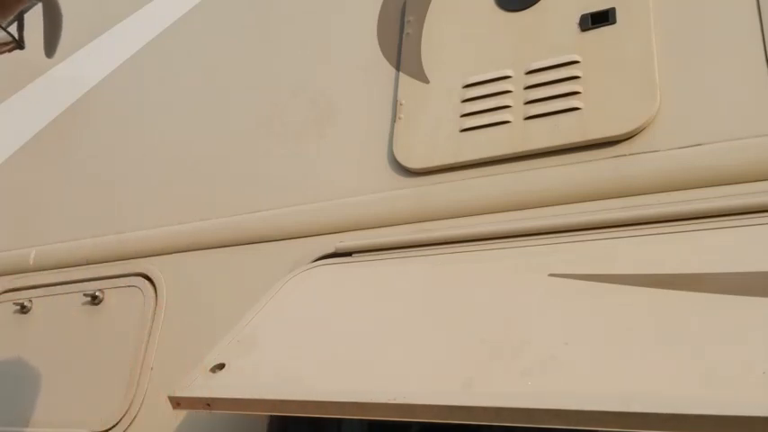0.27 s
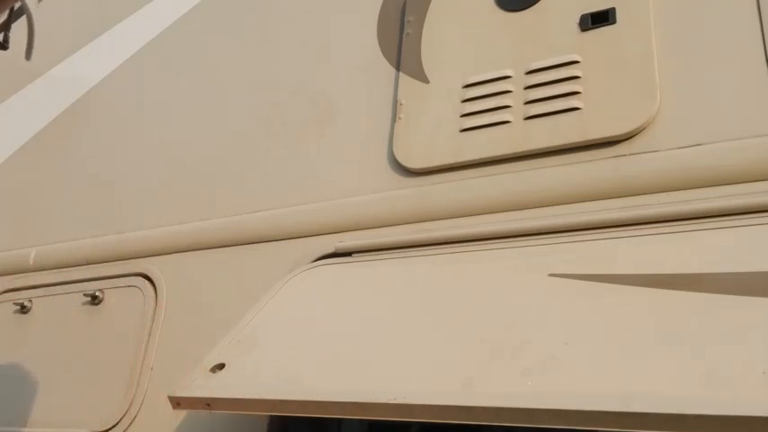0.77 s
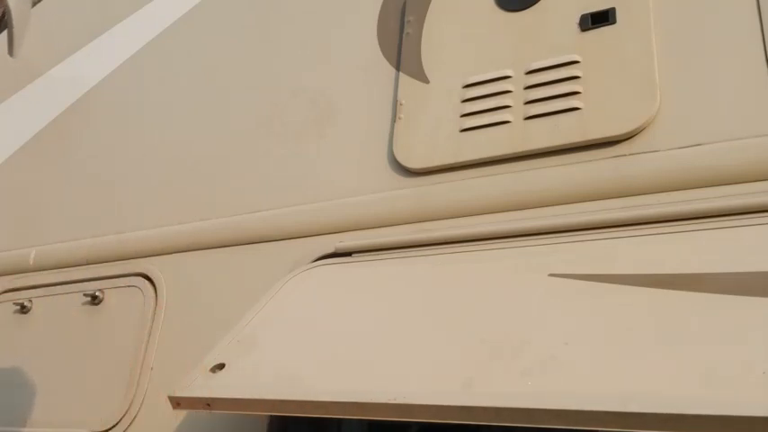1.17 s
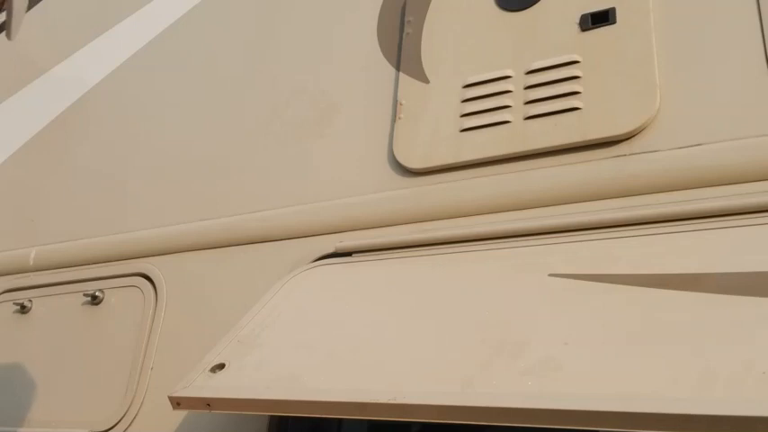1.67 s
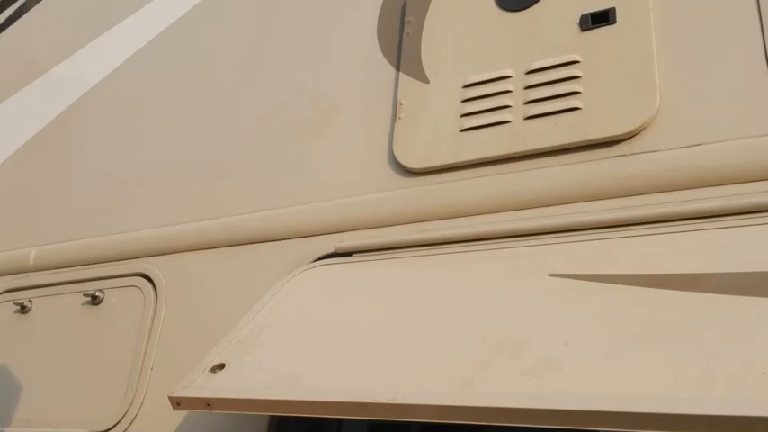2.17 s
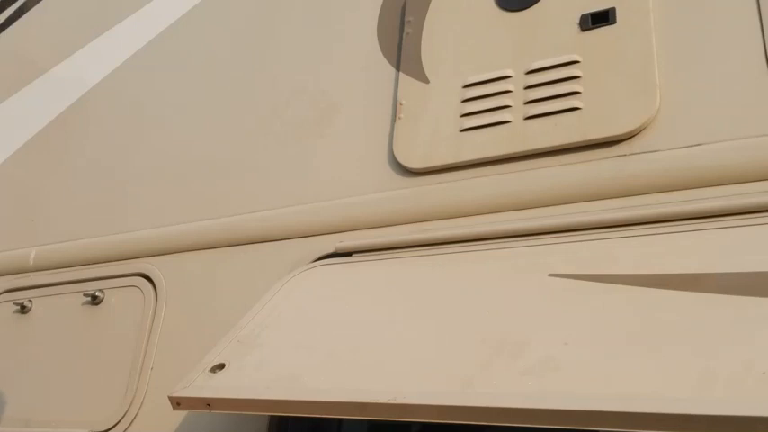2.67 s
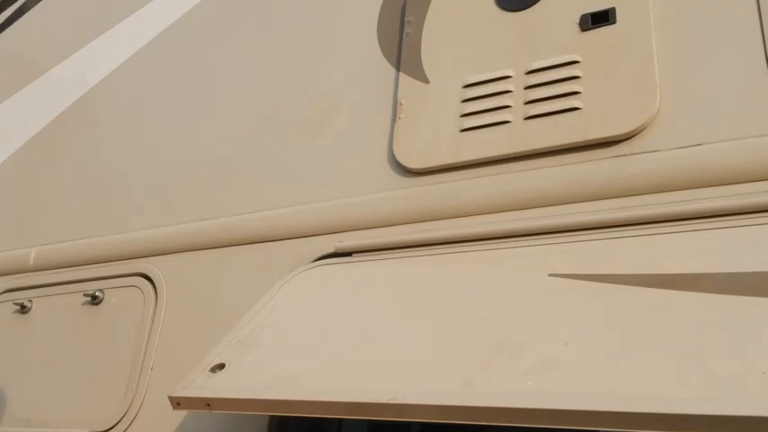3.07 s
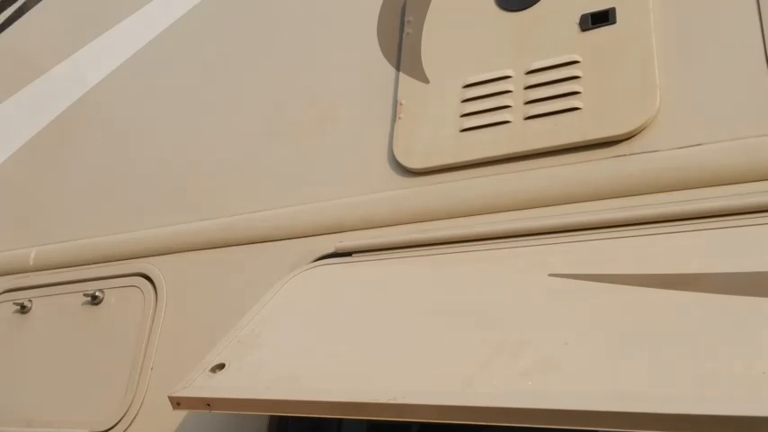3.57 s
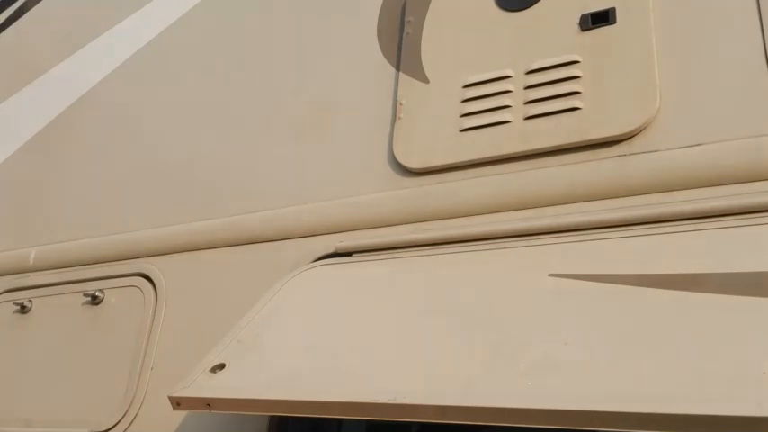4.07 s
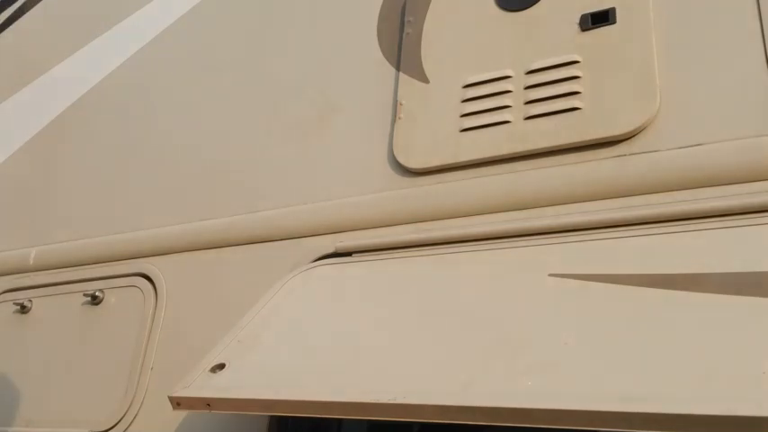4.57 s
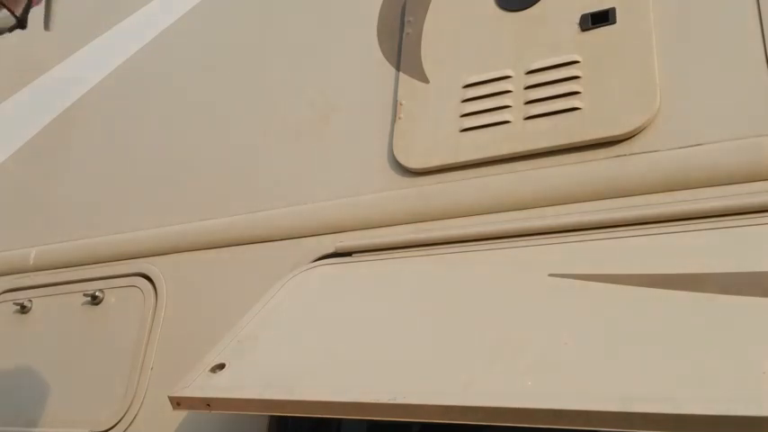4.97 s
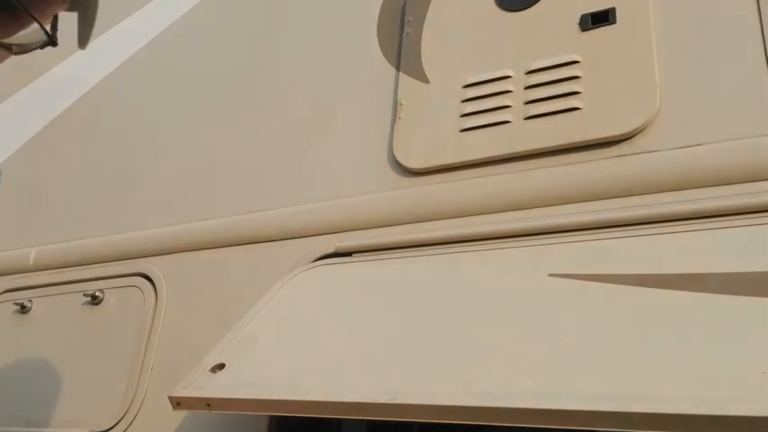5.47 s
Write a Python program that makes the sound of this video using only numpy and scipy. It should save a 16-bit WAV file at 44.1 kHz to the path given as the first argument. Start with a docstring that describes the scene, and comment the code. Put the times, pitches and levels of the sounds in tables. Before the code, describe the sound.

Outdoors, a close stereo microphone pair picks up fingers shuffling tiny metal pieces, stronger on the right and duller on the left. Faint chirps open over rumble and hiss; clusters of clicks and scrapes follow, short bird whistles pass around two seconds, then keen metallic rings and a hard clink. A quieter gap with chirping ends in a last rub and tick.

```python
"""Small metal lock parts are handled over a low rumble of far traffic and a soft hiss, with faint falling bird
chirps near the start and the end. Hands move the parts close by on the right: shaped noise makes the rubbing,
short noise bursts the ticks, and decaying sines the soft knocks and the ringing of three parts. The birds are
gliding sine tones: one sings chirps, another whistles short notes. Filtered noise makes the rumble, the hiss of
traffic and leaves, and the breeze at the left microphone, which also gets single low bumps of air."""
import sys
import numpy as np
from scipy import signal
from scipy.fft import rfft, irfft, next_fast_len
from scipy.io import wavfile
from scipy.ndimage import uniform_filter1d, map_coordinates

SR = 44100
rng = np.random.default_rng(int(sys.argv[2]) if len(sys.argv) > 2 else 0)


def int16_out(signal):
    """Quantize to a 16-bit WAV file."""
    q = np.round(np.clip(np.atleast_2d(signal).T, -1, 1) * 32767)
    wavfile.write(sys.argv[1], SR, q.astype(np.int16))


N = 252252  # length in samples


def amp(db):
    """Turns decibels into a plain multiplier."""
    return 10 ** (np.asarray(db) / 20)


def unit(x):
    """Scales a sound to an average (RMS) strength of one."""
    return x / np.sqrt(np.mean(x ** 2) + 1e-20)


def along(points, hz):
    """Reads a curve of (Hz, value) points, spaced on a log axis."""
    point_hz, value = np.transpose(points)
    return np.interp(np.log(hz + 1), np.log(point_hz + 1), value)


def curves(rows):
    """Gives one value per sample for each column after the time."""
    seconds, *columns = np.transpose(rows)
    return [np.interp(np.arange(N) / SR, seconds, column) for column in columns]


def wobble(rate):
    """Draws a smooth random curve through `rate` random points a second."""
    points = rng.standard_normal(int(N * rate / SR) + 4)
    return map_coordinates(points, [np.arange(N) * rate / SR])


def filtered(x, response):
    """Multiplies the spectrum of x by a complex response of frequency."""
    size = next_fast_len(N + SR // 4)
    spectrum = rfft(x, size) * response(np.fft.rfftfreq(size, 1 / SR))
    return irfft(spectrum, size)[..., :N]


def coloured(x, spectrum, size=8192):
    """Filters x to the shape of a spectrum with no pre-echo, keeping the power of white noise."""
    shape = amp(along(spectrum, np.fft.rfftfreq(size, 1 / SR))) + 0.001
    # folding the cepstrum puts the filter's whole response after time zero
    cepstrum = irfft(np.log(shape), size)
    cepstrum[1:size // 2] *= 2
    cepstrum[size // 2 + 1:] = 0
    pulse = irfft(np.exp(rfft(cepstrum)), size)
    return signal.fftconvolve(x, pulse / np.linalg.norm(pulse))[:N]


def peak(f, hz, width_hz):
    """Gives the response of one resonance, which rings only after it is driven."""
    return 1j * f * width_hz / (hz * hz - f * f + 1j * f * width_hz)


def add(track, seconds, sound):
    """Mixes a sound into a track at a time."""
    part = track[max(round(seconds * SR), 0):][:len(sound)]
    part += sound[:len(part)]


# Where the hands are. Each row: time in seconds, extra level of the left treble in dB.
HAND_POSITION = [(0, -25), (1.5, -7), (2.1, -10), (2.6, -12), (3.3, -30), (4.6, -10.5), (5.4, 1)]
# How the left side is balanced. Each row: frequency in Hz, level of the left side in dB.
HAND_BALANCE = [(200, -2), (1300, 4.5), (4400, -1), (7000, -2)]


def hands():
    """The body holding the microphones shades the left one: later, duller, partly another face of the parts."""
    clumps = (1.4 + catches(rate=350)) * amp(2 * wobble(60))

    def face():
        return rubbing(clumps) + ticks() + knocks() + hollow() + ringing()

    def late(hz):
        delay_s = 0.0003347
        return amp(along(HAND_BALANCE, hz)) * np.exp(-2j * np.pi * hz * delay_s)

    def treble(hz):
        return 1 / (1 + (8200 / (hz + 1)) ** 4)

    right = face()
    left = .6 * right + .8 * face()
    left_treble = filtered(left, lambda hz: late(hz) * treble(hz))
    shaded = amp(curves(HAND_POSITION)[0]) * left_treble
    left_rest = filtered(left, lambda hz: late(hz) * (1 - treble(hz)))
    return np.array([left_rest + shaded, right])


def catches(rate):
    """Random catches, `rate` a second on average: sudden, very unequal, gone in a few milliseconds."""
    draw = rng.random(N)
    size_db = 5 * np.minimum(rng.exponential(size=N), 2.2)
    slip = amp(-60 * np.arange(SR // 50) / SR / .008)  # falls 60 dB in 8 ms
    hits = (draw < rate / SR) * amp(size_db)
    return unit(signal.fftconvolve(hits, slip)[:N])


def patchy(x, depth_db):
    """Every few milliseconds another spot is touched and other frequencies stand out."""
    z = signal.stft(x, nperseg=256)[2]
    field = uniform_filter1d(rng.standard_normal(z.shape), size=2, axis=0)
    field = uniform_filter1d(field, size=4, axis=1)
    return unit(signal.istft(z * amp(depth_db * unit(field)), nperseg=256)[1][:N])


# Parts and fingers sliding. Each row: start in seconds, length in seconds, base level of the scrape in dB,
# base level of the fine metal fizz in dB.
STROKES = [(0.716, 0.094, -63, -63), (0.857, 0.096, -52, -51), (1.013, 0.04, -54, -47.5),
           (1.054, 0.037, -53, -46.5), (1.272, 0.052, -95, -57), (1.326, 0.044, -54, -53),
           (1.357, 0.091, -52.5, -53), (1.507, 0.022, -43, -28), (1.919, 0.036, -59.5, -49.5),
           (2.558, 0.15, -45, -35), (2.595, 0.014, -49.5, -30), (2.747, 0.1, -67, -53.5),
           (2.827, 0.06, -58, -41), (2.978, 0.33, -62, -45), (3.085, 0.11, -49, -37.5),
           (3.159, 0.058, -42, -30.5), (3.23, 0.23, -62, -41), (3.495, 0.18, -69, -43),
           (3.889, 0.015, -33, -17.5), (3.921, 0.1, -46.5, -31.5), (4.177, 0.067, -68, -47.5),
           (4.492, 0.074, -60, -49), (4.562, 0.015, -46.5, -52), (5.093, 0.025, -84, -60),
           (5.488, 0.11, -48, -53), (5.549, 0.14, -45, -50.5)]
# How much skin drags along. Each row: time in seconds, level of the dull body over the scrape in dB.
SKIN_DRAG = [(.75, -7), (.9, -4.5), (1.05, -10.5), (2.1, 4), (2.4, 4), (2.85, -22.5), (3.15, -9),
             (4.6, -13.5), (5.5, -3)]
# The hands' steady small shuffling. Each row: time in seconds, base level in dB.
SHUFFLING = [(.6, -90), (.9, -62), (2.4, -64), (3.4, -64), (3.8, -75.5), (4.6, -78.5), (4.8, -101.5)]
# Tone of the scrape, the fizz and the dull body. Each row: frequency in Hz, relative level in dB.
SCRAPE_TONE = [(530, -26.5), (900, -2.5), (1690, -2), (2110, 2.5), (2930, -4), (3990, 3), (5920, -1),
               (8000, -9), (10400, -55)]
FIZZ_TONE = [(3820, -49), (6500, -15.5), (7360, -28.5), (7750, -16.5), (9940, -6.5), (13200, -4),
             (14100, -7), (16100, -23.5)]
BODY_TONE = [(88, -11.5), (150, -0.5), (225, -6), (352, -2), (1020, -7.5), (1600, -8.5), (2080, -15),
             (3520, -120)]
RISE, HOLD = 0.18, 0.71  # shares of a stroke: fade-in, and where its release begins
SAG_DB, RELEASE_S = 7.5, 0.14  # loss over a stroke's length, and time for the release to add 60 dB


def rubbing(clumps):
    """Surfaces catch and slip: clumped grit excites three regions of the parts and the hands."""
    strokes = np.zeros((2, N))
    for start, length, *db in STROKES:
        t = np.arange(round((length + RELEASE_S / 2) * SR)) / SR
        fade_in = np.clip(t / (RISE * length), 0, 1)
        fall_db = SAG_DB * t / length + 60 * np.clip(t - HOLD * length, 0, None) / RELEASE_S
        for track, level in zip(strokes, amp(db)):
            add(track, start, level * fade_in * amp(-fall_db))
    push = np.array([*strokes, strokes[0] * amp(curves(SKIN_DRAG)[0])])
    push = push + np.outer(amp([1.5, -4, 1.5]), amp(curves(SHUFFLING)[0]))

    def grit(depth_db):
        return patchy(clumps * rng.standard_normal(N), depth_db)

    scrape, fizz, body = push * [grit(depth_db=3.5), grit(depth_db=4.5), grit(depth_db=1.0)]
    return housing(coloured(scrape, SCRAPE_TONE)) + held(coloured(fizz, FIZZ_TONE)) + coloured(body, BODY_TONE)


HOUSING_HZ, HOUSING_WIDTH_HZ, HOUSING_DB = 2860, 280, 5


def housing(x):
    """The lock housing adds a short resonance to ticks and scrapes."""
    return filtered(x, lambda f: 1 + amp(HOUSING_DB) * peak(f, HOUSING_HZ, HOUSING_WIDTH_HZ))


# The parts damped by fingers. Each row: resonance in Hz, its width in Hz, its level in dB.
HELD_MODES = [(10750, 350, 4), (13000, 450, 8), (15500, 300, 5)]


def held(x):
    """Parts between the fingers still colour the fizz and ticks with their strongest modes."""
    return filtered(x, lambda f: 0.89 + sum(amp(db) * peak(f, hz, width_hz) for hz, width_hz, db in HELD_MODES))


# Small contacts. Each row: start in seconds, base level in dB, brightness in dB over an average tick.
TICK_ROWS = [(0.1965, -42.5, -6), (0.231, -34.5, -3.5), (0.5137, -36, -2), (0.7479, -37.5, -6.5),
             (0.783, -29.5, 0), (0.858, -31, -4), (0.863, -27, -5), (0.887, -22, -3.5), (.897, -25, -1),
             (0.9071, -17.5, -1), (.913, -26, -4), (.925, -32, -9), (.9564, -37, 6), (1.057, -29, -2),
             (1.076, -29.5, 6.5), (1.127, -39, -11.5), (1.146, -41, -16.5), (1.153, -34, -9),
             (1.164, -37, 5), (1.1914, -29.5, -10.5), (1.2, -19, -1), (1.3178, -26, -2.5), (1.335, -28, -5),
             (1.34, -25, 0), (1.376, -35, 4), (1.413, -18, -2), (1.4238, -26.5, -5), (1.511, -27.5, 15),
             (1.5298, -18, 5), (1.678, -36, -5), (1.8006, -22, -3.5), (2.058, -28, -2.5),
             (2.089, -36.5, -7), (2.159, -52, -10), (2.441, -28.5, -4), (2.5412, -22, 3),
             (2.5683, -20.5, 2), (2.7557, -31.5, 6.5), (2.997, -33.5, 3), (3.0255, -32.5, 4),
             (3.045, -30, 9), (3.105, -26, 6.5), (3.159, -27, 5.5), (3.3566, -21, 6.5), (3.498, -28.5, 4.5),
             (3.7883, -28, -2.5), (3.8901, -7, -1.5), (4.351, -38, 6.5), (4.517, -35.5, 13),
             (5.489, -37, -4), (5.5947, -21.5, -7.5), (5.6217, -25, 0)]
TICK_T60_S, TICK_ATTACK_S = 0.0088, 0.00046  # time to fall 60 dB, time constant of the onset
TICK_MID_DB, TICK_TREBLE_DB = -11, -6


def ticks():
    """Each tick is a noise burst a few milliseconds long; brighter contacts lean on the treble."""
    low, high = np.zeros(N), np.zeros(N)
    t = np.arange(SR // 50) / SR
    for start, db, bright_db in TICK_ROWS:
        envelope = amp(-60 * t / TICK_T60_S) * (1 - np.exp(-t / TICK_ATTACK_S))
        burst = rng.standard_normal(len(t)) * envelope
        add(low, start, amp(db + TICK_MID_DB - bright_db) * burst)
        add(high, start, amp(db + TICK_TREBLE_DB + bright_db) * burst)
    dull = housing(coloured(low, SCRAPE_TONE)) + amp(-8.0) * coloured(low, BODY_TONE)
    return dull + held(coloured(high, FIZZ_TONE))


# Blows that set a part ringing. Each row: start in seconds, part, base level in dB,
# rough time in seconds until fingers close on it.
BLOW_ROWS = [(0.955, "pin", -38.5, 0.014), (3.105, "key", -36.5, 0.012), (3.159, "key", -27.5, 0.026),
             (3.178, "key", -19, 0.1), (3.193, "key", -22.5, 0.11), (3.308, "pin", -34, 0.0062),
             (3.308, "cam", -42, 0.0065), (3.328, "pin", -29, 0.02), (3.34, "cam", -51, 0.013),
             (3.36, "pin", -29, 0.017), (3.376, "pin", -34.5, 0.035), (3.405, "pin", -41, 0.066),
             (3.499, "key", -41, 0.1), (3.545, "cam", -38, 0.022), (3.565, "pin", -36.5, 0.049),
             (3.612, "pin", -40.5, 0.11), (3.707, "key", -55, 0.054), (3.890, "cam", -17.5, 0.052),
             (3.932, "cam", -24.5, 0.04), (3.967, "cam", -25.5, 0.094), (4.517, "pin", -45, 0.013)]
# The natural tones of three parts. Each table has one column per tone: a row of frequencies in Hz,
# a row of base levels in dB, a row of times in seconds to fall 60 dB when left free.
KEY_MODES = [(7983, 12602, 12635, 12805, 15570), (-9, -3, -7, -2, -20), (.6, .5, .4, .3, .3)]
PIN_MODES = [(8480, 12900), (-15, -1.5), (.8, .9)]
CAM_MODES = [(6390, 8549, 10560, 10830, 10869, 11930, 12170, 13030, 13190, 13840, 15502, 15600),
             (-14, -18, -10, -5, -7, -18, -16, -11, -15, -17, -6, -11),
             (.7, .5, .3, .25, .3, .2, .2, .22, .24, .2, .5, .35)]


def ringing():
    """Every blow rings the part's modes at new strengths; loose contact roughens the ring and the grip ends it."""
    out = np.zeros(N)
    t = np.arange(SR // 3) / SR
    parts = {"key": KEY_MODES, "pin": PIN_MODES, "cam": CAM_MODES}
    for start, part, blow_db, free_s in BLOW_ROWS:
        hz, db, t60 = np.array(parts[part])[:, :, None]
        luck_db = rng.normal(0, 3, hz.shape)
        drift = np.cumsum(rng.normal(0, .022, (len(hz), len(t))), axis=1)  # phase wanders, in radians
        drift = drift + rng.uniform(0, 2 * np.pi, hz.shape)
        flutter_db = 4.5 * wobble(110)[:drift.size].reshape(drift.shape)
        ring = amp(db + luck_db + flutter_db - 60 * t / t60) * np.sin(2 * np.pi * hz * t + drift)
        held_s = np.clip(t - free_s * rng.uniform(.6, 1.2, hz.shape), 0, None)
        grip = amp(-60 * held_s / .05)
        onset = 1 - np.exp(-t / 0.000714)
        add(out, start, amp(blow_db) * (ring * grip).sum(axis=0) * onset)
    return out


# Dull knocks against the palm or door. Each row: start in seconds, base level in dB, frequency in Hz.
KNOCK_ROWS = [(0.086, -49.5, 510), (1.127, -42.5, 640), (1.197, -38.5, 445), (1.319, -42.5, 603),
              (1.375, -39.5, 520), (1.409, -32.5, 570), (3.891, -27.5, 2200), (3.893, -38.5, 920)]


def knocks():
    """Soft contacts: a few cycles of a low mode and a weaker one just below it."""
    out = np.zeros(N)
    t = np.arange(SR // 20) / SR
    for start, db, hz in KNOCK_ROWS:
        tone = np.sin(2 * np.pi * hz * t) + 0.26 * np.sin(2 * np.pi * 0.8 * hz * t)
        add(out, start, amp(db - 60 * t / 0.014) * tone)
    return out


HOLLOW_S, HOLLOW_LENGTH_S, HOLLOW_DB = 2.31, 0.22, -54.5
HOLLOW_HZ, HOLLOW_WIDTH_HZ = 750, 1130


def hollow():
    """One soft swell of rubbing is heard through a low, broad resonance."""
    u = np.clip((np.arange(N) / SR - HOLLOW_S) / HOLLOW_LENGTH_S, 0, 1)
    noise = filtered(rng.standard_normal(N), lambda f: peak(f, HOLLOW_HZ, HOLLOW_WIDTH_HZ) ** 2)
    return amp(HOLLOW_DB) * np.abs(np.sin(np.pi * u)) ** .5 * unit(noise)


# Two songs of falling chirps. Each row: start in seconds, base level in dB,
# base level of the second harmonic in dB.
CHIRP_SONGS = [
    [(.072, -75, 9), (.189, -70, -1), (.315, -74, 1), (.437, -73.5, 5.5), (.575, -72, -0.5), (.7, -72, -8)],
    [(4.597, -74, 6), (4.704, -75.5, 14.5), (4.805, -75, 8.5), (4.912, -74.5, 9), (5.037, -78, 2),
     (5.165, -77, -11.5), (5.29, -77, -13.5), (5.405, -78.5, -14.5)],
]
CHIRP_S, OPEN_HZ, CLOSE_HZ = 0.0509, 2420, 2070  # length, and first-harmonic pitch as a song begins
OPEN_CLIMB_HZ_PER_S, CLOSE_CLIMB_HZ_PER_S = 600, 248  # both ends climb through a song
PAUSE = 0.14  # how much the fall of a chirp lingers halfway
# Whistled notes. Each row: start in seconds, length in seconds, start, middle and end pitch in Hz,
# base level in dB.
WHISTLES = [(.002, 0.04, 2390, 2250, 2200, -80), (1.762, 0.038, 2860, 2630, 2450, -66.5),
            (1.93, .058, 3180, 3080, 3050, -60), (1.991, 0.025, 3040, 2965, 2930, -51.5),
            (2.049, 0.031, 3010, 2830, 2790, -60), (2.094, .058, 2320, 1960, 1970, -65.5),
            (2.148, 0.028, 2280, 2510, 2460, -63), (2.176, 0.023, 2780, 2915, 2900, -66),
            (2.191, 0.024, 2480, 2440, 2540, -67), (2.614, 0.032, 2280, 2180, 2120, -56),
            (2.674, .072, 2850, 3450, 2700, -62), (3.398, 0.049, 2466, 2500, 2520, -68)]


def birds():
    """Whistled tones: a chirp opens on its second harmonic and closes on the first; leaves and walls blur them."""
    out = np.zeros(N)
    u = np.arange(round(CHIRP_S * SR)) / (CHIRP_S * SR)
    for song in CHIRP_SONGS:
        for start, db, second_db in song:
            sung = start - song[0][0]
            open_hz = OPEN_HZ + OPEN_CLIMB_HZ_PER_S * sung
            close_hz = CLOSE_HZ + CLOSE_CLIMB_HZ_PER_S * sung
            fall = u + PAUSE * np.sin(2 * np.pi * u)
            phase = 2 * np.pi * np.cumsum(open_hz + (close_hz - open_hz) * fall) / SR
            first = 1.6 * u * np.sin(phase)
            second = amp(second_db) * (1 - u) ** 1.5 * np.sin(2 * phase)
            add(out, start, amp(db) * np.sin(np.pi * u) ** .5 * (first + second))
    for start, length, *hz, db in WHISTLES:  # the pitch bends smoothly through its three points
        u = np.arange(round(length * SR)) / (length * SR)
        glide = np.polyval(np.polyfit([0, .5, 1], hz, 2), u)
        tone = np.sin(2 * np.pi * np.cumsum(glide) / SR)
        add(out, start, amp(db) * np.sin(np.pi * u) ** .5 * tone)
    t = np.arange(SR // 5) / SR
    tails = rng.standard_normal((2, len(t))) * amp(-60 * t / 0.28)
    blur = signal.fftconvolve(out[None], tails / np.linalg.norm(tails[0]), axes=1)[:, :N]
    direct = np.array([np.roll(out, 18), out])  # the left side is 18 samples later
    return amp([[9], [4]]) * (direct + amp(-4) * blur)


# Slow changes of the low sounds. Each row: time in seconds, base level of the rumble in dB,
# base level of the breeze's buffeting in dB.
LOW_LEVELS = [(0.0, -51.5, -52), (1.8, -43, -53.5), (5.72, -52.5, -59)]
# Single bumps of air on the left microphone. Each row: centre in seconds, level in dB, frequency in Hz.
AIR_BUMPS = [(.72, -33.5, 48.6), (1.902, -23.5, 73.4), (2.047, -26, 63.6), (2.749, -26, 60.5),
             (3.425, -29.5, 68), (4.009, -30, 59.7), (4.976, -29.5, 67.3)]
# Tone of the rumble and of the hiss. Each row: frequency in Hz, relative level in dB.
RUMBLE_TONE = [(12, -37.5), (20, -12.5), (65, 3.5), (83, -2.5), (129, -10.5), (211, -23.5), (319, -29),
               (400, -31), (520, -77.5)]
HISS_TONE = [(120, -23), (200, -0.5), (1030, -14), (2420, -16), (3130, -22), (5060, -16.5), (8030, -44.5),
             (9480, -26.5), (12500, -19), (15300, -21.5)]
# Balance of the hiss. Each row: frequency in Hz, left minus right in dB.
HISS_BALANCE = [(60, 0.5), (550, 2.5), (1650, 7.5), (4970, 3.5), (15000, -6.5)]


def outdoors():
    """Rumble common to both microphones, gusts on the left one, and a wide hiss of far traffic and leaves."""
    rumble_db, buffet_db = curves(LOW_LEVELS)
    common = coloured(rng.standard_normal(N), RUMBLE_TONE)
    own = coloured(rng.standard_normal(N), RUMBLE_TONE)
    left = amp(rumble_db - 1) * common
    left += amp(buffet_db + 2.9 * wobble(17)) * coloured(rng.standard_normal(N), RUMBLE_TONE)
    t = np.arange(-SR // 25, SR // 25) / SR
    for centre, db, hz in AIR_BUMPS:  # one push with an under-swing on each side
        add(left, centre + t[0], amp(db) * np.cos(2 * np.pi * hz * t) * np.exp(-(t * hz * 1.55) ** 2))
    right = amp(rumble_db) * (0.57 * common + 0.44 * own)
    pair = np.array([coloured(rng.standard_normal(N), HISS_TONE) * amp(wobble(4)) for _ in range(2)])

    def turn(hz):
        likeness = along([(300, 0.71), (1000, 0.22), (9000, 0.053)], hz)  # how alike left and right are
        return np.arccos(np.clip(likeness, 0, 1)) / 2

    def far(hz):
        delay_s = np.array([[.0003], [0]])
        return amp(along(HISS_BALANCE, hz) * [[.5], [-.5]]) * np.exp(-2j * np.pi * hz * delay_s)

    a, b = filtered(pair, lambda hz: np.array([np.cos(turn(hz)), np.sin(turn(hz))]))
    return np.array([left, right]) + amp(-64.5) * filtered(np.array([a + b, a - b]), far)


def scene():
    """Adds up the hands, the birds and the outdoor background, in stereo."""
    return hands() + birds() + outdoors()


TOP_HZ = 16100  # band limit


def record(dry):
    """The microphones lose the deepest bass, and nothing is kept from the band limit up."""
    return filtered(dry, lambda hz: (hz < TOP_HZ) / (1 + (26 / (hz + 1)) ** 4))


dry = scene()
out = record(dry)
int16_out(out)
```